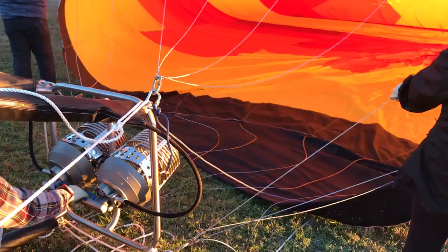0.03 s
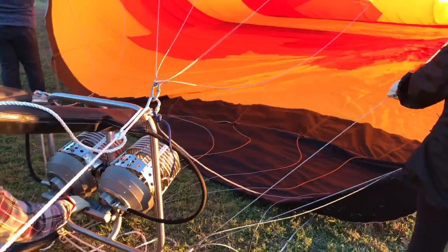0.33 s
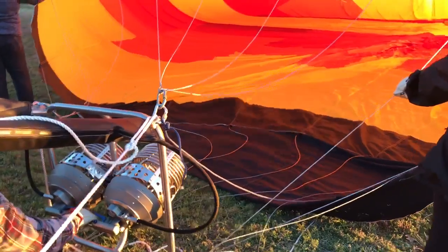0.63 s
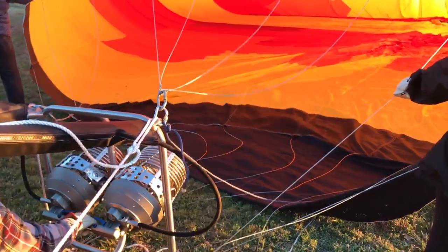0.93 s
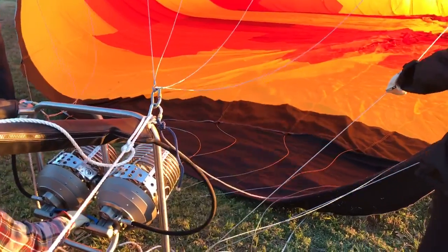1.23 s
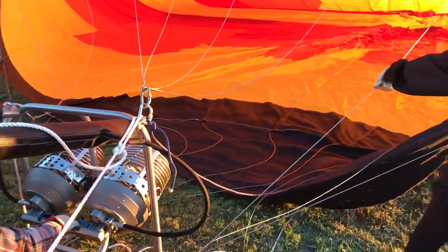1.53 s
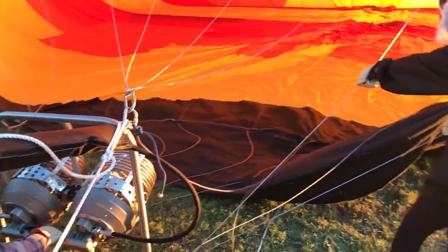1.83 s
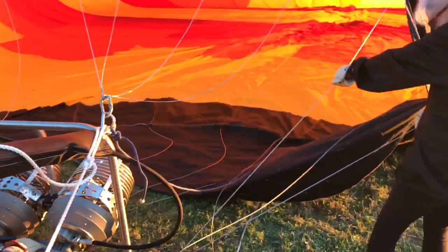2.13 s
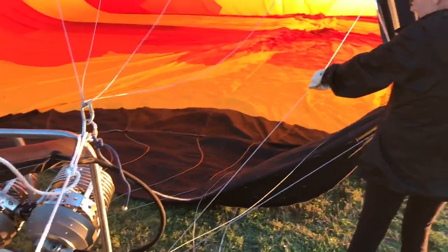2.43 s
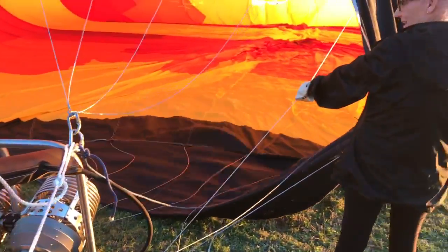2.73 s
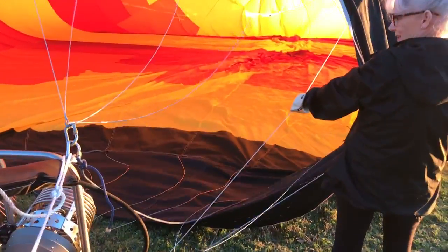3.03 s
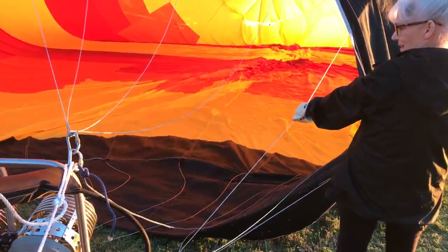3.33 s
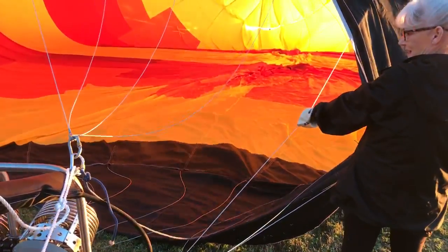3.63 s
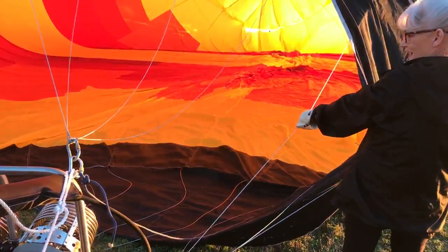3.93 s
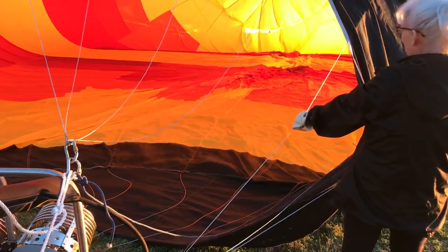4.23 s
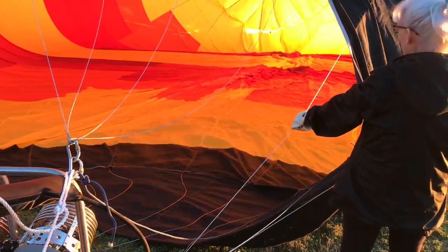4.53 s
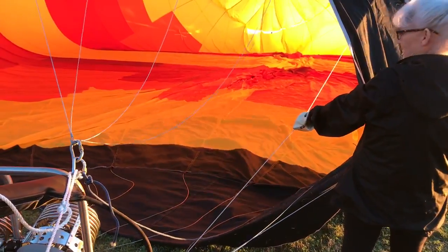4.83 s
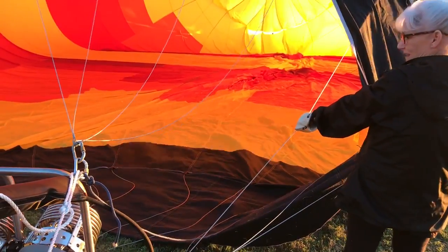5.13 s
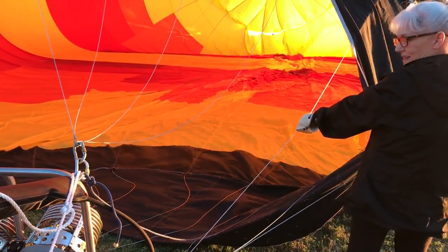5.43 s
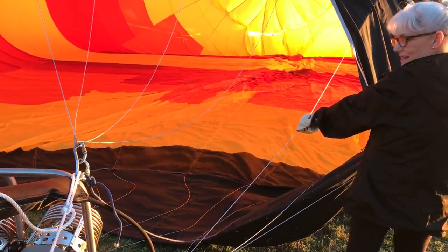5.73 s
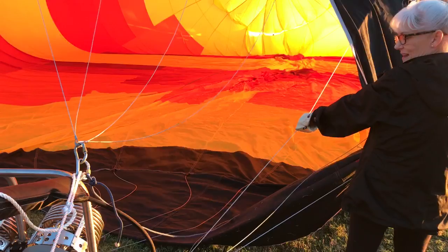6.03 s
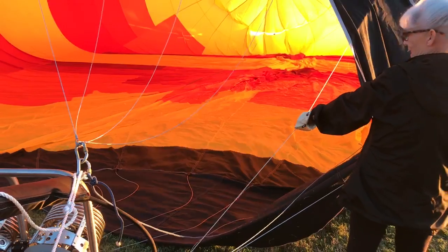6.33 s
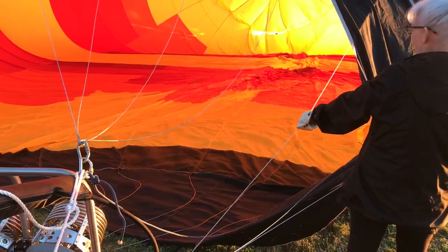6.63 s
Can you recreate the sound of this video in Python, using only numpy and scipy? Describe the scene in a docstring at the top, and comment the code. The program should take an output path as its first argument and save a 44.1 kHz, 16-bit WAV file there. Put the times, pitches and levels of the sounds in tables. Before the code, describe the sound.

A petrol engine fan roars steadily close by, droning and clattering as it blows air into a hot-air balloon.

```python
"""A petrol fan filling a hot-air balloon

A few metres away, a fan blows cold air into a balloon lying on grass. Its one-cylinder four-stroke
engine runs at full throttle: intake and exhaust drone, the valve gear clatters, a metal part rings.
The three-bladed propeller hums and whines over a rush of air that pulses with engine and blades."""
import sys
import numpy as np
from scipy import signal
from scipy.fft import rfft, irfft
from scipy.io import wavfile

SR = 44100
rng = np.random.default_rng(int(sys.argv[2]) if len(sys.argv) > 2 else 0)


def waveform_to_disk(signal):
    """Save audio, clipped to [-1, 1], as 16-bit WAV at the path in sys.argv[1]."""
    frames = np.transpose(np.atleast_2d(signal))
    scaled = np.clip(frames, -1, 1) * 32767
    samples = np.round(scaled).astype(np.int16)
    wavfile.write(sys.argv[1], SR, samples)


N = 294147
T = np.arange(N) / SR


def undb(db):
    """Turn decibels into a gain."""
    return 10 ** (np.asarray(db) / 20)


def level(x, db=0):
    """Scale a sound to an average (rms) level."""
    return x * undb(db) / np.sqrt(np.mean(x ** 2))


def curve(table):
    """Join (time_s, value) rows with straight lines: one value per sample."""
    return np.interp(T, *np.transpose(table))


def colour(x, points):
    """Shape a sound's lows and highs with (pitch_hz, gain_db) points."""
    hz, db = np.transpose(points)
    bins_hz = np.maximum(np.arange(N // 2 + 1) * SR / N, 1)
    gain_db = np.interp(np.log(bins_hz), np.log(hz), db)
    return irfft(rfft(x) * undb(gain_db), N)


def band(x, hz, width_hz):
    """One resonance: keep only the sound near one pitch."""
    return signal.lfilter(*signal.iirpeak(hz, hz / width_hz, fs=SR), x)


def wander(rate_hz, size=2048):
    """A smooth random wobble of spread 1 that changes about rate_hz times a second."""
    bins_hz = np.arange(size // 2 + 1) * SR / N
    spectrum = rfft(rng.standard_normal(size)) * np.exp(-(bins_hz / rate_hz) ** 2)
    return np.interp(T, np.linspace(0, N / SR, size), level(irfft(spectrum, size)))


def swell(cycle, centre, width):
    """A smooth hump once per engine cycle; centre and width are in cycles."""
    offset = (cycle - centre + .5) % 1 - .5
    return np.exp(-.5 * (offset / width) ** 2)


def moving_band(hz, width_hz):
    """A band of noise whose centre pitch can slide."""
    lowpass = signal.butter(2, width_hz / 2, fs=SR, output="sos")
    eddies = signal.sosfilt(lowpass, rng.standard_normal((2, N)))
    angle = 2 * np.pi * np.cumsum(hz) / SR
    return level(eddies[0] * np.cos(angle) + eddies[1] * np.sin(angle))


# The listener steps round the balloon's mouth (share 0 to 1): time_s, share_of_way
LISTENER_PATH = [(1.3, 0), (2.2, .5), (3.4, .85), (4.6, 1)]

def at_listener(first, second):
    """Glide between two values as the listener walks from the first spot to the second."""
    return first + (second - first) * curve(LISTENER_PATH)


# Tone of the clatter: pitch_hz, gain_db
CLATTER_TONE = [(300, -24), (440, 1.5), (560, 2), (720, -6), (950, -0.5), (1400, -3.5), (2500, -13),
                (5000, -14.5), (12000, -38)]

def valve_clatter(cycle, db=-37, drift=0.67, size=1536):
    """Valve gear and crank repeat a run of small knocks every cycle; the run slowly changes."""
    place = (cycle % 1) * size
    runs = rng.standard_normal((3, size))
    steady, extra_a, extra_b = (np.interp(place, np.arange(size), run, period=size) for run in runs)
    knocks = steady + drift * (wander(1.84) * extra_a + wander(2.5) * extra_b)
    return level(colour(knocks, CLATTER_TONE), db)


# How loudly the loose metal part rings: time_s, level_db
RING_LEVEL = [(.2, -38), (1.2, -37), (2.0, -39.5), (2.8, -39.5), (3.3, -33.5), (3.8, -39), (4.25, -35),
              (4.55, -38.5), (4.85, -35), (5.2, -37.5), (5.55, -34.5), (6.1, -37.5), (6.4, -35)]

def metal_ring(cycle, hz=912, centre=0.0603, scatter_db=2.4, scatter_rad=0.55):
    """Each firing shakes a metal part into a short ring, never quite the same twice."""
    firing = np.floor(cycle - centre + .5).astype(int)
    strength, phase = rng.standard_normal((256, 2))[firing % 256].T
    from_peak_s = (cycle - centre - firing) / (np.gradient(cycle) * SR)
    tone = np.cos(2 * np.pi * hz * from_peak_s + scatter_rad * phase)
    bursts = swell(cycle, centre, width=0.08) * undb(scatter_db * strength) * tone
    return level(bursts) * undb(curve(RING_LEVEL))


# Tone of the broad rush of air: pitch_hz, gain_db
RUSH_TONE = [(25, -8), (60, -9), (150, -5), (300, -3), (450, -6.5), (700, 1), (950, -3), (1300, 0),
             (1800, -3.5), (3000, -2.5), (4400, -2.5), (6500, -7), (9200, -8), (16000, -15)]
# The roar as the listener steps in and out of the air stream: time_s, level_db
ROAR_LEVEL = [(.2, -33.2), (1.1, -32.6), (1.6, -30.8), (2.4, -31.5), (3.6, -31.4), (4.2, -29), (5.2, -28.5),
              (6.6, -29)]

def rushing_air(cycle, blade):
    """Churned air rushes and roars, swelling once a cycle and chopped by each blade."""
    roar_db = curve(ROAR_LEVEL)
    rush_db = -30 + 0.31 * (roar_db - roar_db.mean())  # partly follows the roar
    throb_db = 1.9 * swell(cycle, centre=0.31, width=.15) + 0.68 * np.cos(2 * np.pi * (blade - .75))
    rush = colour(rng.standard_normal(N), RUSH_TONE) * undb(throb_db + 0.35 * wander(13))
    roar = moving_band(at_listener(2451, 2790), width_hz=1200)
    # the roar's bright core fades midway between the two spots
    core_db = at_listener(-5, -7.5) - 8.5 * np.sin(np.pi * at_listener(0, 1))
    roar += undb(core_db) * moving_band(at_listener(2359, 2930), width_hz=260)
    roar *= undb(0.89 * throb_db + 0.55 * wander(25))
    return level(rush) * undb(rush_db) + level(roar) * undb(roar_db)


def pipe_drone(cycle, resonances, opens_at, uneven_db):
    """A valve opens at the same point of every cycle; its puff of pressure makes a pipe ring."""
    # the small opening gives off only the overtones of the firing rate
    puffs = sum(np.cos(2 * np.pi * k * (cycle - opens_at)) for k in range(2, 15))
    puffs *= undb(uneven_db * wander(13))
    return sum(np.sign(sign) * undb(db) * band(puffs, hz, width) for hz, width, db, sign in resonances)


# Resonances of the intake and air box (sign -1 flips the wave): pitch_hz, width_hz, gain_db, sign
INTAKE_PIPE = [(57.5, 12, -29, -1), (151.7, 18.6, -32, -1), (209.5, 20.6, -31, -1)]
# Resonances of the exhaust pipe and silencer: pitch_hz, width_hz, gain_db, sign
EXHAUST_PIPE = [(76, 16, -45, -1), (127.9, 12.9, -25, 1), (267.44, 12.7, -26.9, 1), (288, 18, -32.5, -1),
                (326, 23.5, -39, -1), (373, 55, -40, -1)]

def engine_drone(cycle):
    """The engine breathes in through one pipe and out through another."""
    intake = pipe_drone(cycle, INTAKE_PIPE, opens_at=0.4578, uneven_db=0.56)
    exhaust = pipe_drone(cycle, EXHAUST_PIPE, opens_at=.842, uneven_db=0.4)
    return intake + exhaust


def blade_tone(blade, harmonic, db, flutter):
    """A tone at a multiple of the blade rate; swirls in the incoming air make it waver."""
    shake = 1 + flutter * (wander(5.8) + 1j * wander(3.0))  # in strength and in phase
    return level(np.real(shake * np.exp(2j * np.pi * harmonic * blade)), db)


# Loudness of the blades' harmonics 2, 3 and 4: time_s, level_db
SECOND_LEVEL = [(.1, -46), (.4, -33), (.9, -34), (1.4, -41.5), (3, -36.5), (4.8, -42), (5.7, -34),
                (6.6, -39)]
THIRD_LEVEL = [(.2, -52), (2.4, -56), (3, -40), (3.6, -56), (4.8, -52), (5.3, -41.5), (6.6, -52)]
FOURTH_LEVEL = [(.2, -40.5), (1.8, -42.5), (2.3, -48), (3.4, -41.5), (4.4, -42), (5.5, -46), (6.1, -58),
                (6.5, -40)]
# The high tones of the whine: harmonic_number, offset_db
WHINE_TONES = [(6, 0), (7, 1), (8, -1), (9, -4)]

def propeller(blade):
    """Passing blades make a steady hum, middle tones that come and go, and a wavering whine."""
    hum = blade_tone(blade, harmonic=1, db=at_listener(-22, -21.5), flutter=0.031)
    hum += blade_tone(blade - .09, harmonic=2, db=curve(SECOND_LEVEL), flutter=0.15)
    hum += blade_tone(blade, harmonic=3, db=curve(THIRD_LEVEL), flutter=0.42)
    hum += blade_tone(blade, harmonic=4, db=curve(FOURTH_LEVEL), flutter=0.46)
    hum += blade_tone(blade - .33, harmonic=5, db=at_listener(-38.3, -41.5), flutter=0.3)
    whine_db = at_listener(-44, -53.5)
    whine = sum(blade_tone(blade, harmonic, whine_db + db, flutter=0.54) for harmonic, db in WHINE_TONES)
    return hum + whine


# Fan speed, drifting around the speed governor's setting: time_s, blade_rate_hz
FAN_SPEED = [(0.3, 173.81), (1.2, 173.27), (2.1, 172.63), (2.9, 173.17), (3.7, 172.81), (4.4, 172.28),
             (5.3, 172.19), (6.0, 172.99), (6.6, 172.84)]

def scene():
    """Engine and propeller share one shaft: two turns, so six blade passes, to each firing."""
    blade = np.cumsum(curve(FAN_SPEED)) / SR - .97  # counts blade passes
    cycle = blade / 6  # counts engine cycles
    engine = engine_drone(cycle) + metal_ring(cycle) + valve_clatter(cycle)
    return (engine + propeller(blade) + rushing_air(cycle, blade))[None]


# Narrow dips in the microphone's treble (share 0 to 1): pitch_hz, width_hz, share_removed
TREBLE_DIPS = [(3790, 240, 0.16), (4920, 420, 0.46), (7750, 480, 0.36), (10430, 850, 0.44)]
MIC_ON_S, TOP_HZ = .083, 15750

def record(dry):
    """The microphone dips parts of the treble, opens just after the start and cuts the very top."""
    for hz, width_hz, depth in TREBLE_DIPS:
        dry = dry - depth * band(dry, hz, width_hz)
    lowpass = signal.ellip(12, .1, 80, TOP_HZ, fs=SR, output="sos")
    return signal.sosfilt(lowpass, dry * (T > MIC_ON_S))


dry = scene()
out = record(dry)
waveform_to_disk(out)
```